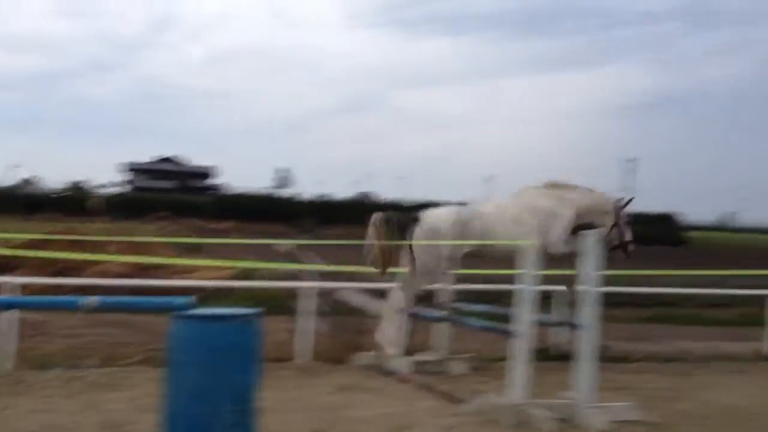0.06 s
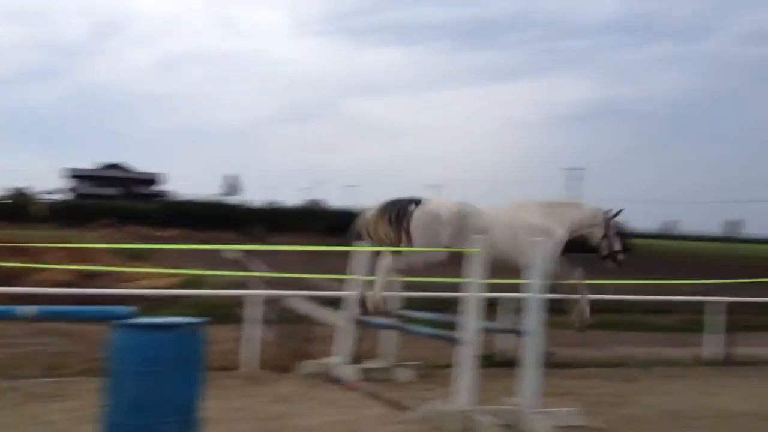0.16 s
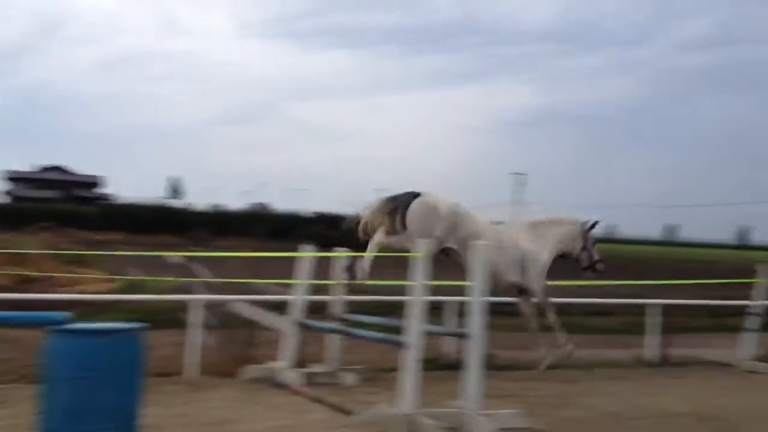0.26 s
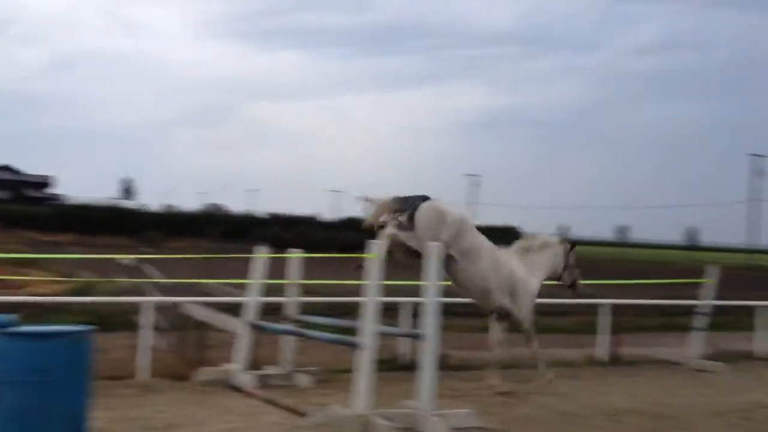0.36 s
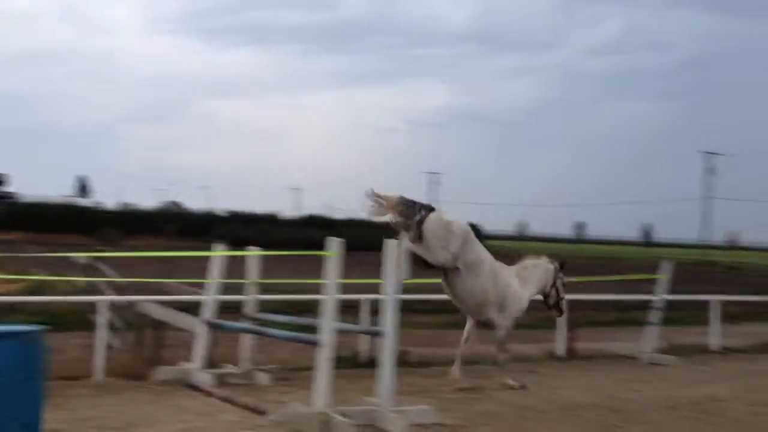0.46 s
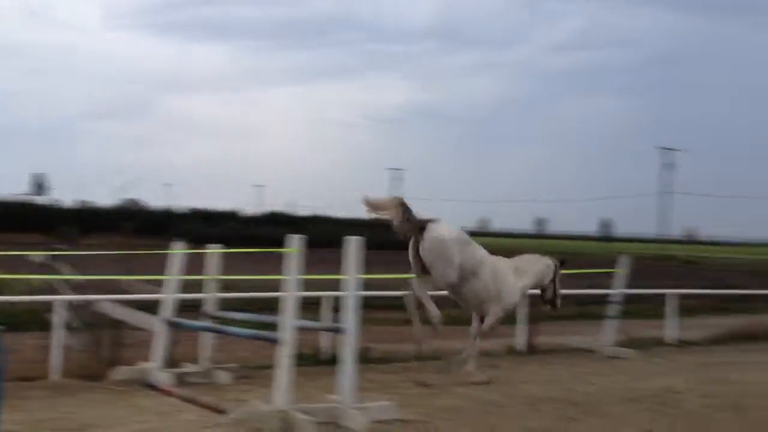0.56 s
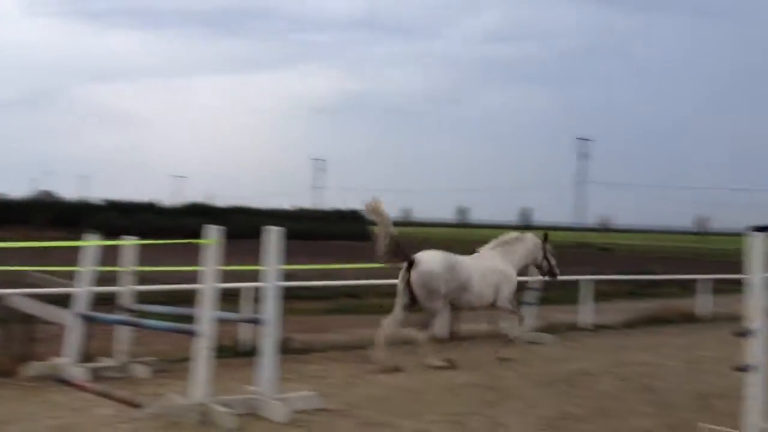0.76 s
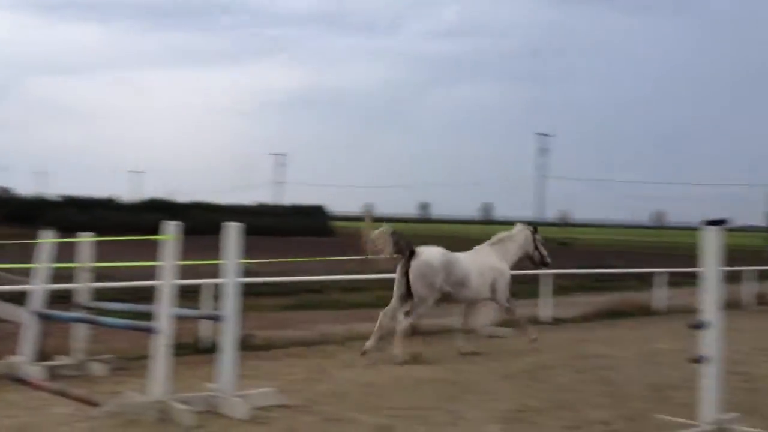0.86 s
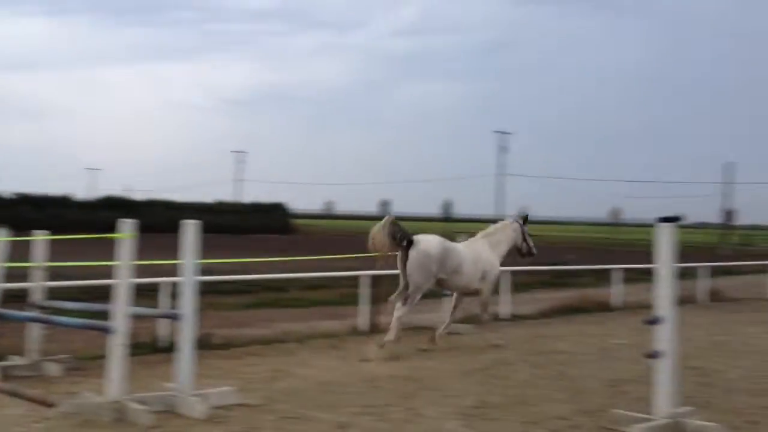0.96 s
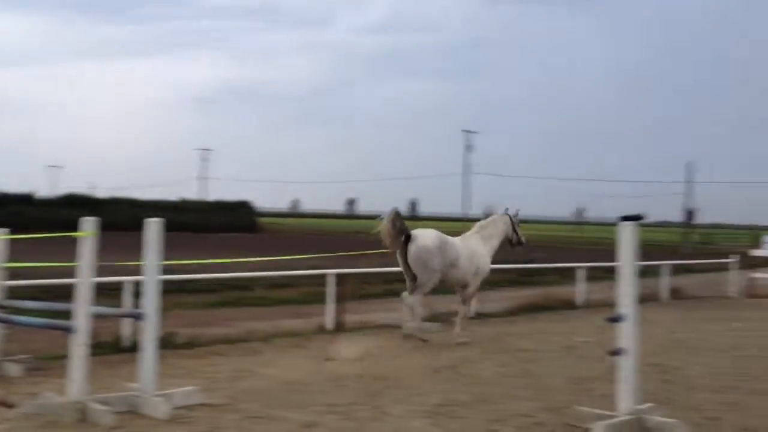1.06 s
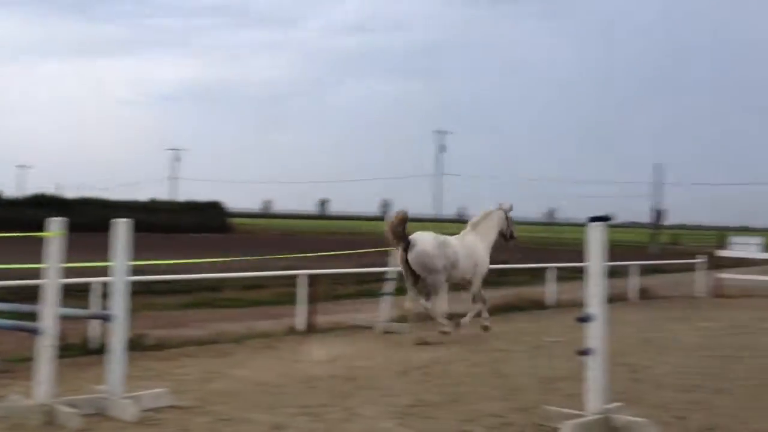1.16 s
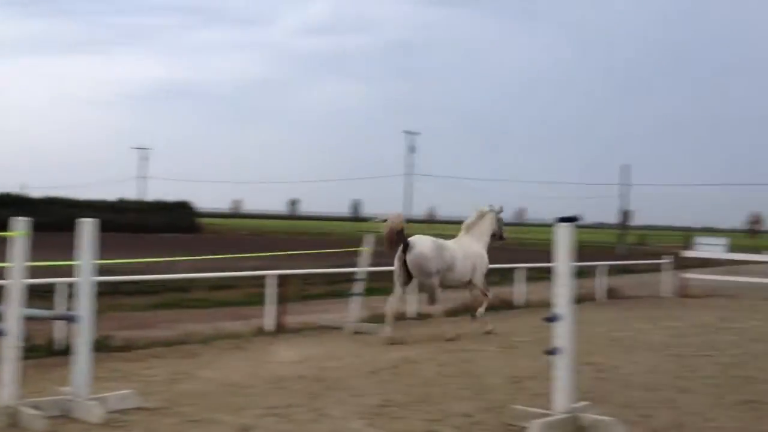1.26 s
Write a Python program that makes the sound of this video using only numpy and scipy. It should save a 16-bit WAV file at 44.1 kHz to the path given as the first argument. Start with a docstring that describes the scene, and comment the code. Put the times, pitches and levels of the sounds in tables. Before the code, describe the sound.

Dull hoof thuds of a horse landing and cantering away over sand, under low wind gusts.

```python
"""An outdoor sand arena, heard through one microphone in the wind. A horse clears a jump, lands
with one hollow clop as the hoof rings, and canters away, each hoof a dull thud in the ground.
The hooves click on grit and throw up short sprays of sand that trickles back. Low gusts buffet
the microphone, the strongest ones brighter, over a faint open-air hiss."""
import sys
import numpy as np
from scipy import signal
from scipy.fft import rfft, irfft
from scipy.io import wavfile
from scipy.ndimage import uniform_filter1d

SR = 44100
rng = np.random.default_rng(int(sys.argv[2]) if len(sys.argv) > 2 else 0)


def digitize_waveform(pressure):
    """Quantize a signal to 16-bit integers and store it at the path in sys.argv[1].

    Rows of a 2-D input are taken as channels; values are limited to [-1, 1].
    """
    field = np.atleast_2d(pressure).T
    bounded = np.clip(field, -1, 1)
    quanta = np.round(bounded * 32767).astype(np.int16)
    wavfile.write(sys.argv[1], SR, quanta)


N = 57330
T = np.arange(N) / SR


def undb(db):
    """Decibels to gain."""
    return 10 ** (np.asarray(db) / 20)


def unit(x):
    """Scale to rms 1."""
    return x / np.sqrt(np.mean(x ** 2))


def curve(points):
    """Gain over time from (s, dB) points."""
    return undb(np.interp(T, *np.array(points).T))


def band(x, low_hz, high_hz, order=3):
    """Band-pass, rms 1."""
    return unit(signal.sosfilt(signal.butter(order, [low_hz, high_hz], "band", fs=SR, output="sos"), x))


def noise(colour):
    """Noise with a spectrum of (Hz, dB) points, rms 1."""
    hz, db = np.array(colour).T
    bin_hz = np.arange(N // 2 + 1) * SR / N
    gain = undb(np.interp(np.log(bin_hz + 1), np.log(hz), db))
    return unit(irfft(rfft(rng.standard_normal(N)) * gain, N))


def burst(start, length, attack_s, decay_s):
    """Envelope that rises, holds until start + length and dies away exponentially."""
    return np.clip((T - start) / attack_s, 0, 1) * np.exp(-np.maximum(T - start - length, 0) / decay_s)


def even_out(x, window_s=0.043, evenness=0.52):
    """Partly level the swells of a noise so that they are of similar strength, rms 1."""
    power = uniform_filter1d(x ** 2, int(window_s * SR))
    power = uniform_filter1d(power, int(window_s * SR / 2))
    return unit(x / (power + 1e-9) ** (evenness / 2))


def strike(ring, age, contact_s=0.00095):
    """Let a ring build up over the time of contact, peak 1."""
    ring = ring * (1 - np.exp(-(age / contact_s) ** 2))
    return ring / np.abs(ring).max()


def grains(per_second=11000, spread_db=4):
    """Dense clicks of sand grains, a few much larger than the rest."""
    hit = rng.random(N) < per_second / SR
    return hit * rng.standard_normal(N) * undb(spread_db * np.minimum(rng.exponential(size=N), 4))


def thuds(rise_s=0.0051, pitch_scatter=0.016):
    """Each hoof presses into the sand and sets the ground swinging for a few low cycles."""
    # Each row: start in seconds, peak level in dB, pitch in Hz.
    hoof_falls = [(0.462, -26, 244), (0.494, -31, 176), (0.54, -25, 179), (0.562, -22, 230),
                  (0.763, -37.5, 238), (0.8, -25, 186), (0.839, -19.5, 208), (0.854, -20, 204),
                  (0.873, -20, 169), (0.953, -25.5, 193), (1.149, -33, 156), (1.179, -35, 217),
                  (1.277, -32.5, 150)]
    out = np.zeros(N)
    for (start, db, hz), detune in zip(hoof_falls, rng.standard_normal(len(hoof_falls))):
        age = np.maximum(T - start, 0)
        swell = (age / rise_s * np.exp(1 - age / rise_s)) ** 2.1
        out += undb(db) * swell * np.sin(2 * np.pi * hz * (1 + pitch_scatter * detune) * age)
    return out


def clop(width_octaves=0.5, muffle_hz=1650):
    """The landing hoof rings briefly, duller as it settles; the sand muffles the top."""
    # Toe, sole, then settling. Each row: start in seconds, peak level in dB, most excited pitch in Hz.
    contacts = [(0.5542, -29.5, 1480), (0.5628, -23.5, 990), (0.5712, -28, 640), (0.5795, -58, 640)]
    # The hoof's hollow ring. Each row: frequency in Hz, relative level in dB, seconds to fall 60 dB.
    modes = [(503, -4.5, 0.074), (647, 2, 0.066), (702, -4.5, 0.053), (890, -3.5, 0.033),
             (1125, 5.5, 0.021), (1221, 2.5, 0.032), (1434, -5.5, 0.026), (1560, -5, .022)]
    out = np.zeros(N)
    for start, db, centre_hz in contacts:
        age = np.maximum(T - start, 0)
        ring = np.zeros(N)
        for (hz, mode_db, t60), phase in zip(modes, rng.normal(0, 0.5, len(modes))):
            excitation = 1 / (1 + (np.log2(hz / centre_hz) / width_octaves) ** 2)
            ring += excitation * undb(mode_db - 60 * age / t60) * np.sin(2 * np.pi * hz * age + phase)
        out += undb(db) * strike(ring, age)
    return signal.sosfilt(signal.butter(8, muffle_hz, fs=SR, output="sos"), out)


def ticks():
    """Short bright clicks where a hoof catches coarse grit."""
    # Each row: start in seconds, peak level in dB, pitch in Hz.
    clicks = [(0.0660, -49, 2180), (0.081, -50, 2040), (0.1379, -43, 2610), (0.8654, -49.5, 1920),
              (1.1660, -44.5, 1584)]
    # A click's ring. Each row: multiple of the pitch, relative level in dB, seconds to fall 60 dB.
    modes = [(.72, -3, 0.012), (1, -0.5, 0.028), (1.17, 7, 0.0082), (1.55, -11, 0.018), (1.95, -8, 0.017)]
    out = np.zeros(N)
    for start, db, hz in clicks:
        age = np.maximum(T - start, 0)
        ring = np.zeros(N)
        for (ratio, mode_db, t60), phase in zip(modes, rng.standard_normal(len(modes))):
            ring += undb(mode_db - 60 * age / t60) * np.sin(2 * np.pi * hz * ratio * age + phase)
        out += undb(db) * strike(ring, age)
    return out


def sand():
    """Sand scuffs and crunches under the hooves, sprays out and trickles back."""
    # Each row: start and length in seconds, scuff, crunch, grit and hiss in dB, top of the hiss in Hz.
    sprays = [(0.001, 0.0095, -61, -62.5, -62, -63.5, 9400), (0.0650, 0.0044, -68, -72, -58.5, -61.5, 9900),
              (0.074, 0.0074, -62, -57, -60, -63, 9100), (0.112, 0.0067, -66, -54.5, -61, -61.5, 9000),
              (0.1355, 0.0054, -78, -68, -52.5, -51.5, 11100), (0.423, .012, -78, -60.5, -62.5, -70, 13000),
              (0.446, 0.021, -50.5, -78, -83, -76, 8700),
              (0.492, 0.0093, -44.5, -58.5, -62.5, -62.5, 12500),
              (0.5532, 0.0098, -45.5, -78, -52.5, -63.5, 8200),
              (0.568, 0.035, -48, -60.5, -64.5, -69, 9700), (0.638, 0.011, -55.5, -65, -69.5, -69.5, 10300),
              (0.658, .009, -50.5, -61, -74, -78, 8450), (0.696, 0.013, -57, -60.5, -64, -64, 12400),
              (0.756, 0.0073, -43.5, -56.5, -59, -57.5, 14700),
              (0.806, 0.0073, -39.5, -57.5, -61.5, -63, 11900),
              (0.814, .030, -51.5, -67, -68, -73.5, 12000), (0.959, 0.0027, -65, -62, -62, -85, 8000),
              (0.998, 0.038, -65.5, -66, -67.5, -72, 14000), (1.055, 0.033, -70, -64, -65, -72.5, 12000),
              (1.222, 0.0038, -70, -59.5, -63, -63, 11200)]
    # Loose sand falling back. Each row: time in seconds, level in dB.
    trickle = [(0, -71.5), (0.16, -67.5), (0.21, -79), (0.40, -81), (0.45, -73), (0.62, -69), (0.9, -73.5),
               (1.07, -69.5), (1.3, -71)]
    scuff = even_out(band(grains(), 376, 707))
    crunch = band(grains(), 830, 1770)
    grit = band(grains(), 2040, 5450)
    fine_sand = grains()
    out = curve(trickle) * band(grains(), 1570, 7500, order=2)
    for start, length, *levels_db, top_hz in sprays:
        hiss = band(fine_sand, 6350, top_hz, order=2)
        spray = undb(levels_db) @ np.array([scuff, crunch, grit, hiss])
        out += burst(start, length, attack_s=0.0011, decay_s=0.0043) * spray
    return out


def wind(knee_hz=183):
    """Eddies rumble on the microphone, with short buffets; the strongest reach higher in pitch."""
    # The rumble's rise and fall. Each row: time in seconds, level in dB.
    gusts = [(0, -50.5), (0.06, -51.5), (0.087, -42), (0.115, -55.5), (0.205, -48.5), (0.26, -49.5),
             (0.31, -43.5), (0.43, -37.5), (0.52, -35), (0.60, -37), (0.66, -42), (0.74, -47.5),
             (0.79, -37.5), (0.93, -41.5), (1.0, -40), (1.08, -55), (1.16, -46), (1.3, -49.5)]
    # The rumble's spectrum. Each row: frequency in Hz, relative level in dB.
    colour = [(25, -33), (50, -33), (80, -10), (130, 0), (190, 0), (260, -9), (350, -16.5), (550, -27.5),
              (900, -42), (2000, -68)]
    # Each row: start and length in seconds, level in dB, upper edge in Hz.
    buffets = [(0.235, 0.043, -31.5, 289), (0.327, 0.025, -37.5, 207), (0.383, 0.0057, -35.5, 333),
               (0.429, 0.015, -34.5, 287), (0.812, 0.028, -31.5, 407), (0.836, 0.022, -28, 530),
               (0.855, 0.039, -28, 379)]
    out = curve(gusts) * even_out(noise(colour))
    roll_off = signal.butter(1, knee_hz, fs=SR, output="sos")
    for start, length, db, top_hz in buffets:
        turbulence = signal.sosfilt(roll_off, rng.standard_normal(N))
        swirl = even_out(band(turbulence, 119.3, top_hz))
        out += undb(db) * burst(start, length, attack_s=0.0044, decay_s=0.0091) * swirl
    return out


def open_air(level_db=-57):
    """The faint, steady hiss of the open air behind the horse."""
    # Each row: frequency in Hz, relative level in dB.
    colour = [(25, -8), (60, -5.5), (180, 7), (350, 3.5), (600, 4), (1050, 0.5), (1500, -7), (2000, -9.5),
              (2800, -15), (4200, -17.5), (8000, -22.5), (11000, -22.5), (15000, -20.5)]
    return undb(level_db) * noise(colour)


def scene():
    """Hooves, sand and wind over the open air, in mono."""
    return (thuds() + clop() + ticks() + sand() + wind() + open_air())[None]


def record(dry):
    """The recorder thins the deepest bass and cuts the top."""
    low_hz, top_hz = 53, 15200
    thinned = signal.sosfilt(signal.butter(1, low_hz, "high", fs=SR, output="sos"), dry)
    return signal.sosfilt(signal.ellip(8, 0.2, 70, top_hz, fs=SR, output="sos"), thinned)


dry = scene()
out = record(dry)
digitize_waveform(out)
```